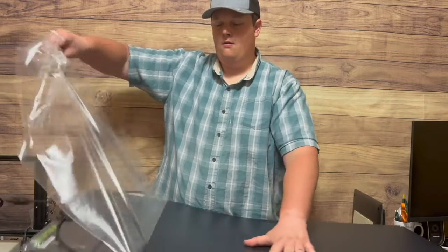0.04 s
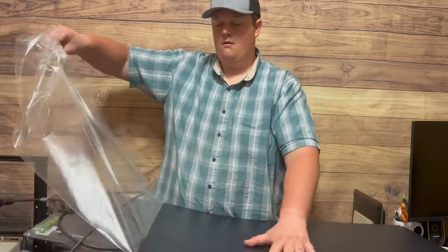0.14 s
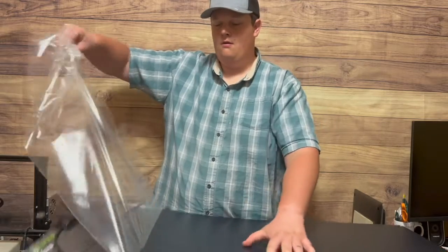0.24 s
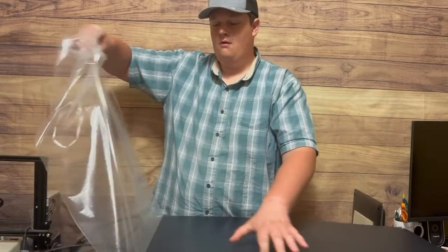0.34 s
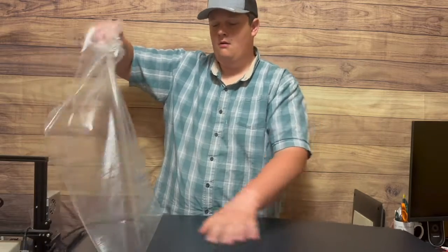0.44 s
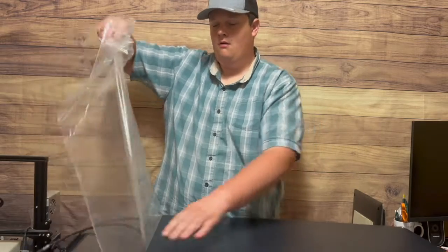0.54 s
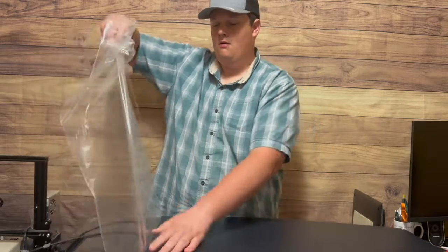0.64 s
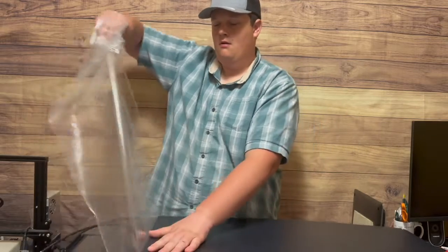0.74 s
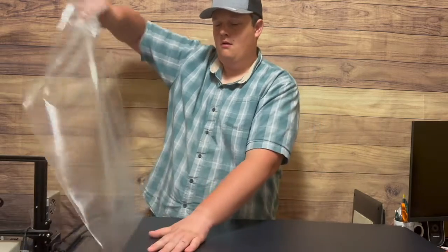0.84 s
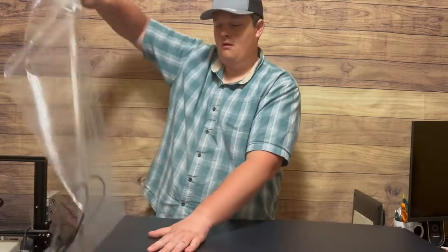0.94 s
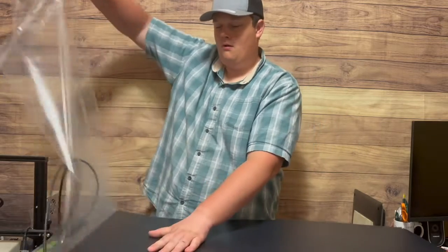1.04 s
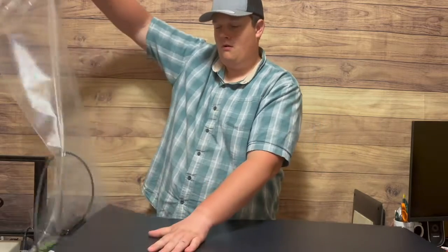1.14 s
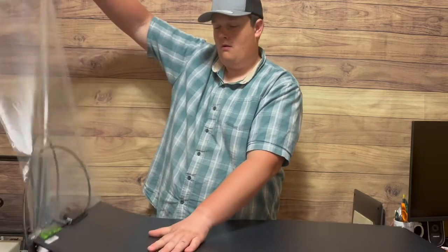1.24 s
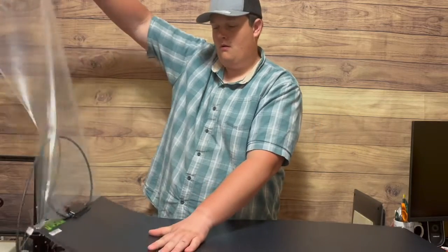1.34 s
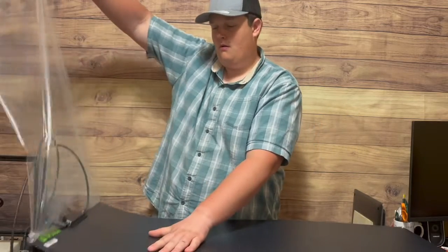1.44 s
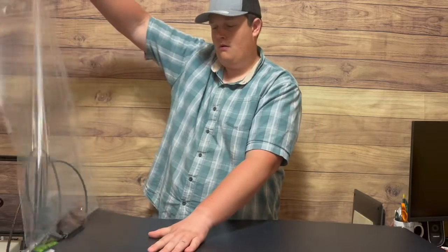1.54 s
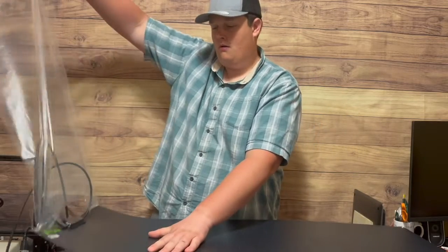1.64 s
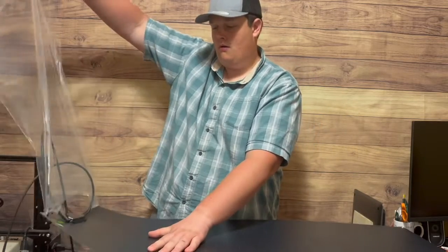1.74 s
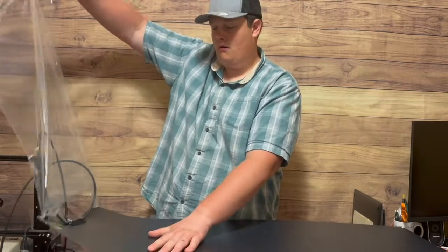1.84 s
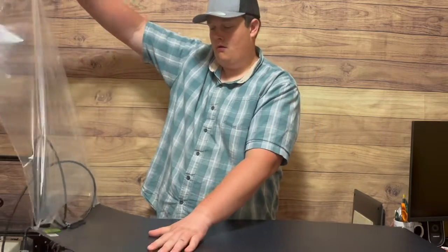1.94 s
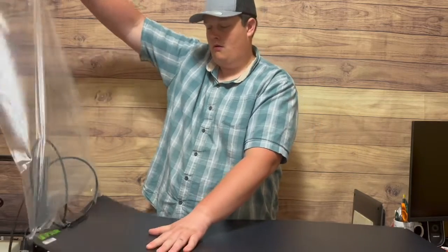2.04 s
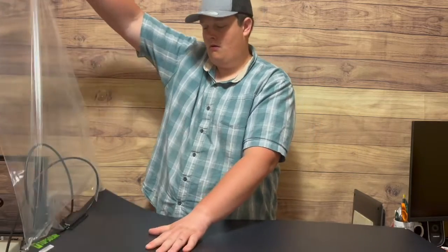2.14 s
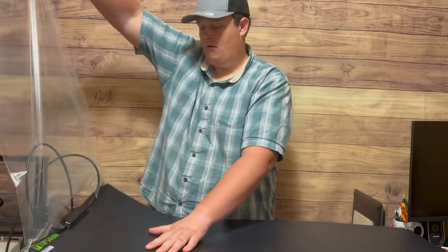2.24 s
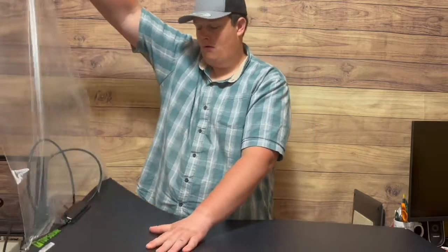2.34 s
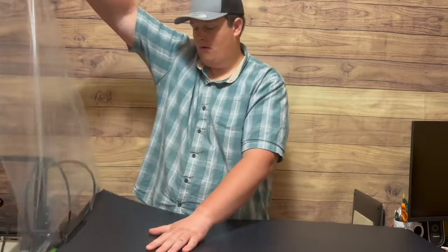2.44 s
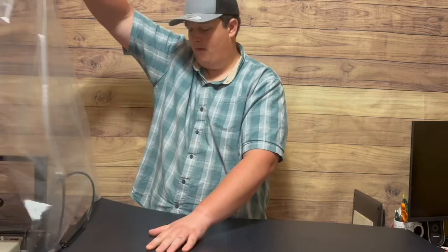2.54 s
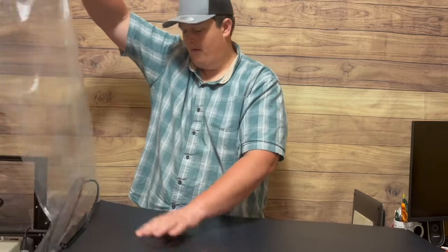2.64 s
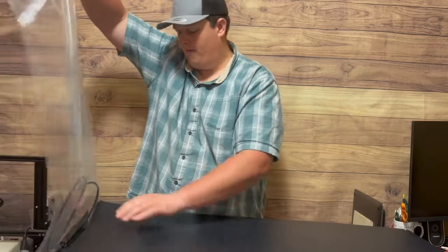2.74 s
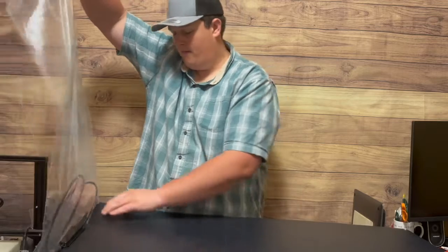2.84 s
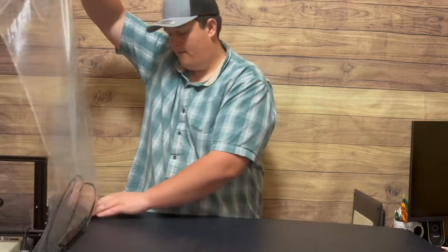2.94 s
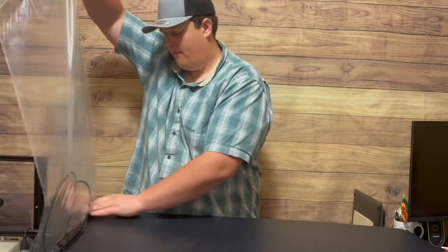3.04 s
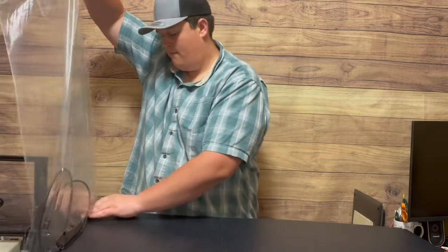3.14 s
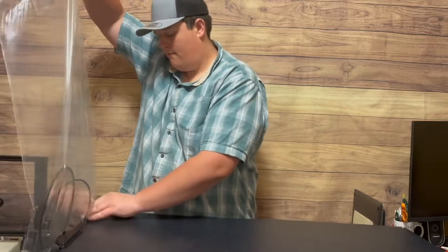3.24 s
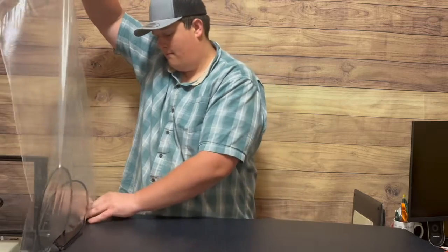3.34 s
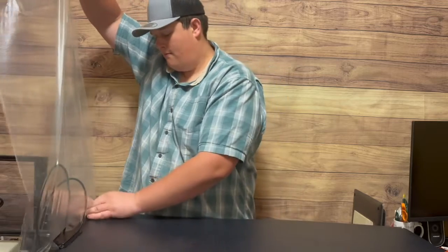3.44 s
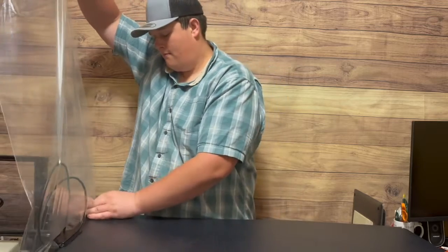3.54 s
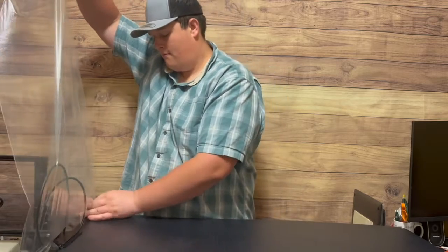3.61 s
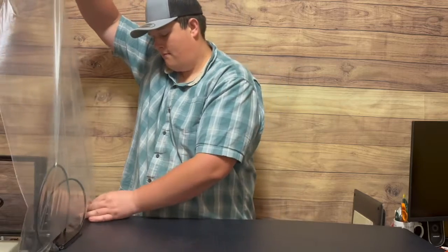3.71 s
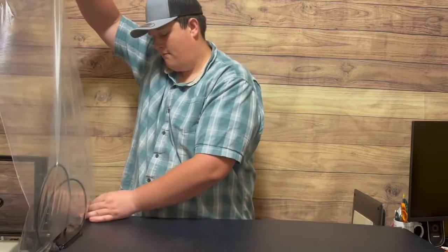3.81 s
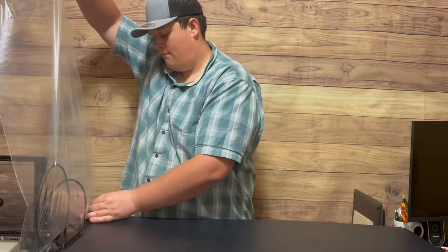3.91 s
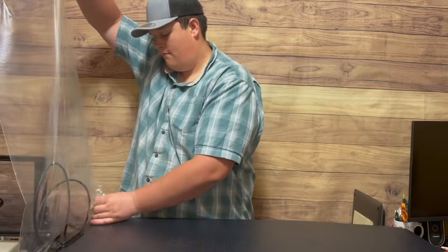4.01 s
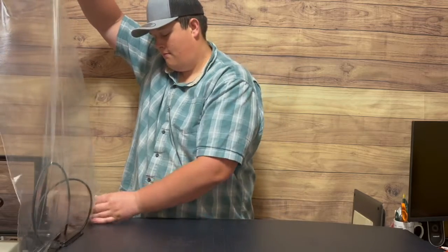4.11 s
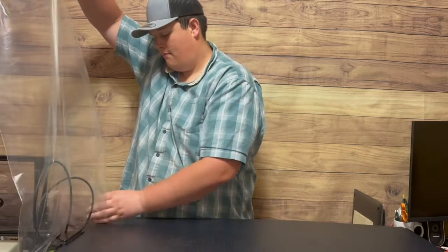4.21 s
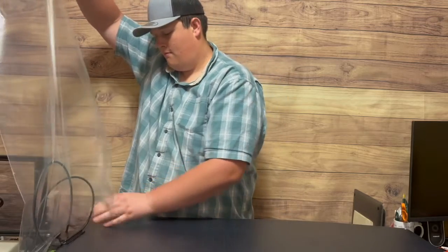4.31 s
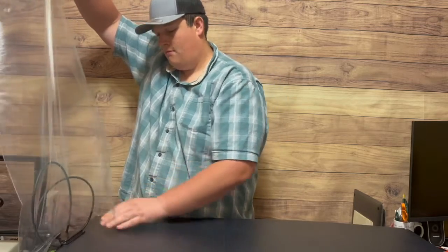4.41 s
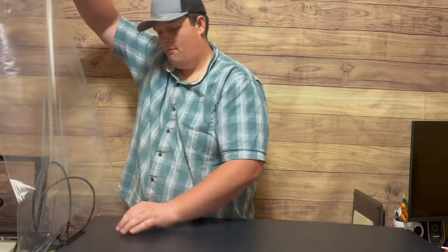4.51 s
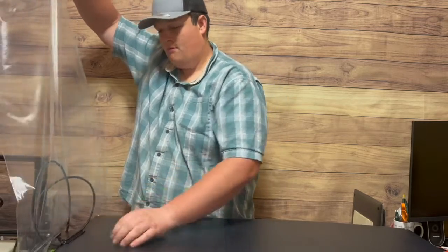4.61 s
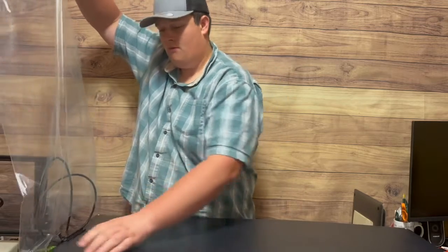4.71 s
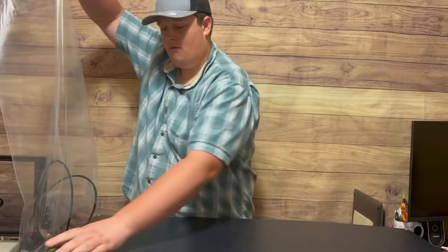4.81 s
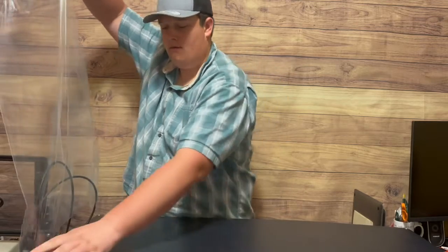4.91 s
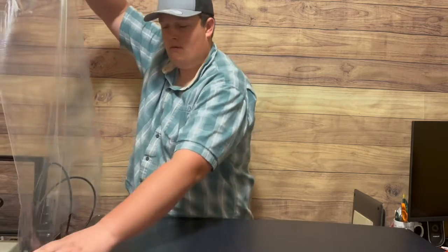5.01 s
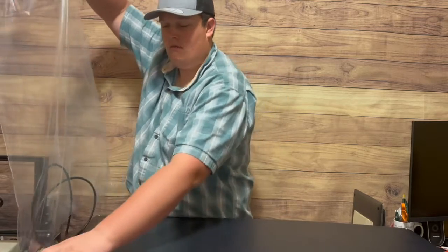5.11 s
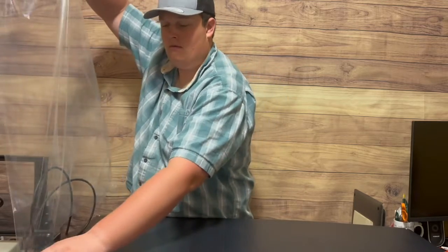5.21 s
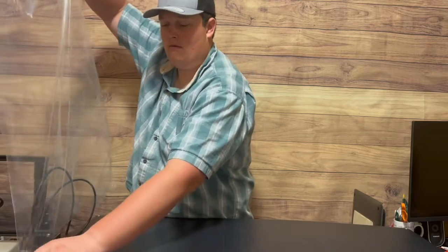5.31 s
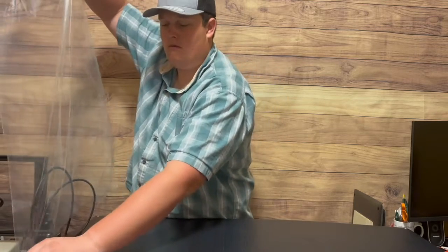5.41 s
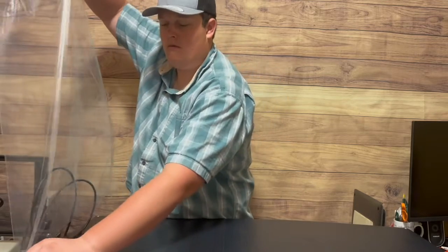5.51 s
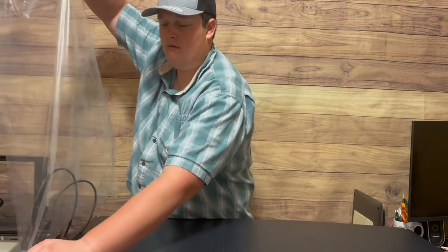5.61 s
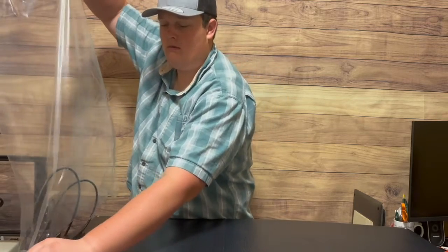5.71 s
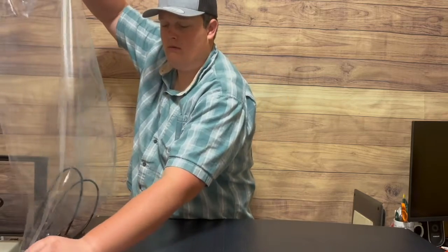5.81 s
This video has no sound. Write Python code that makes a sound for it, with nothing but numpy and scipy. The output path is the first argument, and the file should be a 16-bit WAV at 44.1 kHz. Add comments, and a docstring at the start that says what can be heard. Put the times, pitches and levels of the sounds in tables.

```python
"""Dense plastic crackle comes first, in strong surges over about a second, then mostly weaker tugs, snaps and
pops. A big bag of thin clear film is lifted and tugged off a panel at a desk in a small room, close to a pair
of microphones and a little to their left. Rustle, snaps and ticks are clicks of buckling creases, filtered;
pops are short swings of a facet or, at low pitch, thumps of the whole sheet, rubs are slips that ring the
stretched film, and air is faint filtered noise. Sounds come from seven places on the sheet, each with its own
reflections."""
import sys
import numpy as np
from scipy import signal
from scipy.fft import rfft, irfft, next_fast_len
from scipy.io import wavfile

SR = 44100
rng = np.random.default_rng(int(sys.argv[2]) if len(sys.argv) > 2 else 0)


def materialize(psi):
    """Save the field psi as 16-bit PCM at rate SR to the path in sys.argv[1].

    A 1-D psi becomes a single channel; in a 2-D psi each row is a channel.
    """
    bounded = np.clip(np.atleast_2d(psi).T, -1, 1)
    quanta = np.round(bounded * 32767).astype(np.int16)
    wavfile.write(sys.argv[1], SR, quanta)


N = 258426
TIME = np.arange(N) / SR
CUTOFF_HZ = 15800  # top of the recorded band
PLACES = 7  # sounding places on the sheet


def from_db(db):
    """Decibels to gain."""
    return 10 ** (np.asarray(db) / 20)


def rms_one(x):
    """Scale to unit rms."""
    return x / np.sqrt(np.mean(x ** 2) + 1e-20)


def unit(x):
    """Scale to unit energy."""
    return x / (np.linalg.norm(x) + 1e-12)


def at_hz(rows, hz):
    """Each column of a table, joined on a log-frequency axis."""
    table_hz, *columns = np.transpose(rows)
    log_hz = np.log(np.maximum(hz, 1))
    return [np.interp(log_hz, np.log(table_hz), column) for column in columns]


def drift(rate):
    """Slow random curve of unit rms, through `rate` random points a second."""
    knots = rng.standard_normal(4096)
    return rms_one(np.interp(TIME * rate, np.arange(len(knots)), knots))


def colour(x, spectrum, size=2048):
    """Causal (minimum-phase) filter with the given spectrum, of unit energy below the cut-off, on every row."""
    hz = np.arange(size // 2 + 1) * SR / size
    # folding the cepstrum onto positive time makes the phase minimal
    cepstrum = irfft(np.log(from_db(at_hz(spectrum, hz)[0])))
    cepstrum[1:size // 2] *= 2
    cepstrum[size // 2 + 1:] = 0
    response = np.exp(rfft(cepstrum))
    response /= np.sqrt(np.mean(abs(response) ** 2 * (hz < CUTOFF_HZ)))
    impulse = np.float32(irfft(response))[None]
    return signal.oaconvolve(np.float32(x), impulse, axes=1)[:, :N]


def resonate(x, hz, width_hz):
    """A two-pole resonance that gives a unit click about unit energy."""
    r = np.exp(-np.pi * width_hz / SR)
    zeros = np.sqrt((1 - r * r) / 2) * np.array([1, 0, -1])
    poles = [1, -2 * r * np.cos(2 * np.pi * hz / SR), r * r]
    return signal.lfilter(zeros, poles, x + 1e-18)


def buckles(per_s, spread_db):
    """Random clicks of mean power about 1; a positive spread makes a few large, a negative one a few small."""
    chance = np.clip(per_s / SR, 1e-5, 1)
    sizes = rms_one(from_db(spread_db * np.minimum(rng.exponential(1, N), 4)))
    signs = rng.choice([-1, 1], N)
    return (rng.random(N) < chance) * sizes * signs / np.sqrt(chance)


def over_sheet(clicks, wander_rate=14, scatter=1.3):
    """Deal clicks to places on the sheet, around a fold that wanders across it."""
    fold = PLACES * drift(wander_rate) / 2
    place = np.round(fold + scatter * rng.standard_normal(N)) % PLACES
    return clicks * (place == np.arange(PLACES)[:, None])


def add(out, index, s, sound):
    """Put a sound at its time, each event at the next place on the sheet."""
    span = out[index % PLACES, round(s * SR):][:len(sound)]
    span += sound[:len(span)]


# Steady air noise of the room, falling off above 2 kHz: (frequency [Hz], relative level [dB per Hz])
AIR_SPECTRUM = [(20, -12), (50, 7), (95, 7.5), (170, -5.5), (300, -10), (600, -14), (2000, -10),
                (2400, -25), (6000, -44), (15000, -26)]


def air(level_db=-56.5):
    """Steady filtered noise, independent at every place, so that it fills the room faintly."""
    noise = colour(rng.standard_normal((PLACES, N)), AIR_SPECTRUM)
    return from_db(level_db) * noise / np.sqrt(PLACES)


# Crinkle of the hanging bag, which keeps stirring between tugs: (time [s], crinkle level [dB])
STIRRING = [(0, -50.5), (0.62, -53.5), (1.3, -47), (1.95, -61), (2.3, -63.5), (2.6, -57), (3.6, -62),
            (3.93, -66.5), (4.3, -62.5), (4.9, -68), (5.12, -66), (5.6, -64.5), (5.86, -64.5)]


def stirring():
    """Crinkle level (dB) of the stirring bag at every sample."""
    return np.interp(TIME, *np.transpose(STIRRING))


# A single crease heard close, for ticks and snaps alike: (frequency [Hz], relative level [dB])
CREASE_SPECTRUM = [(150, -15.5), (700, 2.5), (2000, 3.5), (5000, 4), (8500, 4.5), (10400, 1), (12500, 9),
                   (15600, 2.5)]


def ticks(per_s=12, over_stir_db=-6.5):
    """Lone faint creases let go at random about the sheet, louder as the bag stirs more."""
    level = from_db(stirring() + over_stir_db)
    return colour(over_sheet(level * buckles(per_s, spread_db=1.0)), CREASE_SPECTRUM)


# Film rubs on the panel's edge and one stretched facet sings; levels are before the mix:
# (middle [s], time from middle to 1/e [s], level [dB], pitch [Hz], resonance width [Hz])
RUB_EVENTS = [(1.065, 0.013, -25, 850, 79.6), (1.695, 0.021, -34, 1340, 400),
              (2.19, 0.022, -44.5, 1080, 160), (2.268, 0.012, -42.5, 1115, 160),
              (2.405, 0.013, -48.5, 2040, 500), (3.18, 0.034, -43.5, 1290, 350),
              (4.652, 0.009, -58, 625, 150), (4.955, 0.013, -60, 2500, 1500)]


def rubs(slips_per_s=1500, size=8192):
    """Uneven slips swell and fade, feeding one resonance of the stretched film."""
    out = np.zeros((PLACES, N))
    from_middle = (np.arange(size) - size / 2) / SR
    slips = buckles(slips_per_s, spread_db=-8.5)
    for k, (s, length_s, level_db, hz, width_hz) in enumerate(RUB_EVENTS):
        own_slips = slips[k * size:(k + 1) * size]
        tone = resonate(resonate(own_slips, hz, width_hz), hz, 2 * width_hz)
        swell = np.exp(-(from_middle / length_s) ** 2)
        rub = unit(tone * swell) * np.linalg.norm(swell)
        add(out, k, s + from_middle[0], from_db(level_db) * rub)
    return out


# A taut facet of the sheet pops over, or at low pitch the whole sheet thumps; energies are before the mix: #
# (time [s], energy [dB], pitch [Hz], swing time [cycles])
POP_EVENTS = [(0.3735, -1, 4170, 0.35), (0.3762, 12.5, 940, 0.61), (0.386, 7.5, 1234, 1.8),
              (0.457, -7, 1050, 0.37), (1.565, -1, 540, 4.8), (2.254, -19, 1130, 0.2),
              (2.616, -6.5, 1170, 0.52), (2.657, -8.5, 1750, 0.18), (2.70, -12, 61.7, 0.43),
              (2.976, -9.5, 1330, 0.21), (3.968, -3.5, 205, 0.52), (4.0067, 1.5, 1500, 0.15),
              (4.007, 3.5, 376, 0.94), (4.6885, -17.5, 4380, 0.28), (5.468, -5.5, 900, 0.17),
              (5.472, -2, 3300, 0.48), (5.48, -11, 84, 1), (5.681, -20, 3960, 0.85)]


def pops(size=4096):
    """A facet, or at low pitch the whole sheet, gathers speed, flips through and swings out within a few
    cycles."""
    out = np.zeros((PLACES, N))
    age = np.arange(size) / SR
    for k, (s, energy_db, hz, cycles) in enumerate(POP_EVENTS):
        progress = age * hz / cycles
        swing = np.sin(2 * np.pi * hz * age) * progress ** 2 * np.exp(-progress)
        add(out, k, s, from_db(energy_db) * unit(swing))
    return out


# Single creases snapping; energies are before the mix:
# (time [s], energy [dB], run of buckles that it sets off, relative to the crease [dB])
SNAP_EVENTS = [(0.376, -40, 24), (0.602, -17.5, 3), (1.378, -15.5, 4), (1.4683, -12.5, 0), (1.4949, 0, 0),
               (1.6674, -12.5, 7), (1.6941, -3.5, 2.5), (1.709, 1, -4), (1.8022, -11.5, -17),
               (2.0006, -31, 9), (2.055, -26, 2), (2.2555, -38, 11), (2.3361, -16, -22), (2.371, -30, 12),
               (2.452, -13, 3.5), (2.852, -25, -10), (2.8861, -21.5, -10), (3.1738, -24.5, 7.5),
               (3.468, -15.5, -10), (3.492, -22, 4), (3.6267, -23, -13), (3.6636, -12.5, -32),
               (3.7423, -23, -7), (3.763, -16, -6), (3.8277, -16, -1), (3.965, -13, 11.5), (4.0172, -7, -9),
               (4.1824, -26, 9), (4.1898, -22, -1), (4.2472, -23, 6), (4.313, -13.5, -1),
               (4.3598, -16.5, 2), (4.3958, -9, -16), (4.5859, -17.5, 3), (4.6885, -14.5, -8),
               (4.8012, -23, -1), (5.1524, -28.5, 7), (5.4666, -4, 6.5), (5.6802, -30, 10.5),
               (5.7835, -19.5, -7.5), (5.8427, -11.5, -8)]


def snaps(travel_s=0.0004127, run_s=0.0062, run_per_s=2000, size=2048):
    """A crease gives way at once and trips a dying run of its neighbours."""
    out = np.zeros((PLACES, N))
    age, hz = np.arange(size) / SR, np.arange(size // 2 + 1) * SR / size
    # bending waves cross the film faster the higher they are; travel_s is their time at the cut-off
    crease = unit(irfft(np.exp(-4j * np.pi * travel_s * np.sqrt(hz * CUTOFF_HZ))))
    followers = buckles(run_per_s, spread_db=3.0)
    for k, (s, energy_db, run_db) in enumerate(SNAP_EVENTS):
        run = unit(followers[k * size:(k + 1) * size] * np.exp(-age / run_s))
        add(out, k, s - travel_s, from_db(energy_db) * (crease + from_db(run_db) * run))
    return colour(out, CREASE_SPECTRUM)


# Tugs and shakes of the bag; rise and fall times each cover 20 dB, the last three levels are over the crinkle:
# (full pull [s], rise [s], hold [s], fall [s], crinkle [dB], billow [dB], flexing [dB], sharpest creases [dB])
TUG_EVENTS = [(0.0, .05, 0.092, 0.12, -24, -5, -0.5, 1.5),
              (0.374, 0.0037, 0.0046, 0.077, -31.5, 6.5, 13, -3.5),
              (0.484, 0.087, 0.0092, 0.093, -46, 8.5, 7.5, 3.5), (0.523, 0.036, 0.013, .05, -47, 8, 11, 5),
              (0.78, 0.078, .08, 0.094, -25.5, -1, 3.5, 2.5), (0.866, 0.085, 0.048, 0.23, -22, -30, 1, 2),
              (1.052, 0.14, 0.16, 0.08, -26.5, -5.5, 0.5, 3.5),
              (1.38, 0.19, 0.013, 0.11, -46, -3, -2.5, -1.5),
              (1.495, 0.0049, 0.017, 0.11, -32.5, -7.5, 0, 1.5),
              (1.563, 0.076, 0.013, 0.11, -30.5, -8.5, 0.5, -1),
              (1.70, 0.039, 0.0045, 0.083, -38.5, -0.5, -1.5, 8.5),
              (1.843, 0.071, 0.028, 0.05, -40.5, -3, 1, -3),
              (2.077, 0.2, 0.054, .11, -47.5, -26, -2.5, -6.5),
              (2.41, 0.076, 0.059, 0.17, -49.5, -23, -15.5, -5), (2.564, 0.044, .03, 0.16, -41, -8, -3, -2),
              (2.655, 0.058, 0.053, 0.14, -40.5, -3, 5, -13),
              (2.992, 0.055, 0.032, 0.087, -44, -4, 3.5, -2.5),
              (3.158, 0.12, 0.045, .15, -45.5, -6, -0.5, -4.5), (3.32, 0.2, .04, 0.11, -55.5, -11, -11, -1),
              (3.494, 0.062, 0.023, 0.1, -48.5, -12, -8, -3), (3.55, .05, 0.012, 0.076, -54.5, -10, 0.5, 4),
              (3.812, 0.049, .015, 0.064, -47, -11, -2.5, -4),
              (3.962, 0.0053, 0.012, 0.11, -33, -2.5, 1.5, -1.5),
              (4.002, 0.0065, 0.0051, 0.073, -41.5, 9.5, 11, -14),
              (4.259, 0.3, .13, 0.1, -49, -8.5, -3, -4), (4.576, 0.075, 0.005, 0.065, -50, -5, 0.5, 0),
              (4.701, 0.038, 0.027, 0.097, -54, -14, -27, -8), (5.185, 0.036, 0.057, 0.12, -61, -8, 7, 15),
              (5.259, .1, 0.022, 0.15, -43, -28, -2.5, -9.5), (5.469, 0.011, 0.017, 0.079, -38, -6, 3, 1.5),
              (5.851, 0.04, .02, .1, -39, -18, -6.5, -7)]


def handling(sway_db=-58, stir_flex_db=-1.5, stir_sharp_db=-5.5):
    """Levels (dB) of billow, flexing, crinkle and sharpest creases: tugs rise, hold and die over sway and stirring."""
    stir_db = stirring()
    sway = np.full(N, sway_db)  # the whole sheet sways a little all the time
    power = from_db([sway, stir_db + stir_flex_db, stir_db, stir_db + stir_sharp_db]) ** 2
    for s, rise_s, hold_s, fall_s, level_db, billow_db, flex_db, sharp_db in TUG_EVENTS:
        corners = [s - 4 * rise_s, s, s + hold_s, s + hold_s + 4 * fall_s]
        pull_db = np.interp(TIME, corners, [-80, 0, 0, -80])
        on = pull_db > -80
        kinds = from_db([billow_db, flex_db, 0, sharp_db])
        power[:, on] += np.outer(kinds, from_db(level_db + pull_db[on])) ** 2
    return 10 * np.log10(power)


# What one buckle radiates, from the whole sheet down to the sharpest crease;
# each is (frequency [Hz], relative level [dB])
BILLOW_SPECTRUM = [(25, -32), (50, -5), (90, 4), (140, 9), (280, -1), (400, 1.5), (900, -60.5)]
FLEX_SPECTRUM = [(130, -31), (240, 0.5), (340, 2.5), (800, 0.5), (1300, -0.5), (1800, -4.5), (2600, -9.5),
                 (6000, -47)]
CRINKLE_SPECTRUM = [(600, -48), (1300, 0.5), (2000, 2), (3200, 3.5), (5500, 0.5), (7500, -6.5), (9500, -27),
                    (15000, -16)]
SHARP_SPECTRUM = [(3000, -77), (6500, -0.5), (8500, 4.5), (10400, -13.5), (12400, 6.5), (14300, 2.5),
                  (15600, 3.5)]


def rustle(loud_per_s=10000, loud_db=-22, crowding=.75, clump_db=0.84, clump_rate=110):
    """The harder the pull, the more creases give way each second; they go in clumps."""
    billow_db, flex_db, crinkle_db, sharp_db = handling()
    per_s = loud_per_s * from_db(crowding * (crinkle_db - loud_db))
    clumps_db = clump_db * drift(clump_rate)
    billow = from_db(billow_db) * buckles(per_s, spread_db=2.5)
    flex = from_db(flex_db + clumps_db) * buckles(per_s, spread_db=2.0)
    crinkle = from_db(crinkle_db + clumps_db) * buckles(per_s, spread_db=4.0)
    sharp = from_db(sharp_db + clumps_db) * buckles(per_s, spread_db=-3.5)
    kinds = [(billow, BILLOW_SPECTRUM), (flex, FLEX_SPECTRUM),
             (crinkle, CRINKLE_SPECTRUM), (sharp, SHARP_SPECTRUM)]
    return sum(colour(over_sheet(clicks), spectrum) for clicks, spectrum in kinds)


# The pitch that each place on the sheet favours, from slack and wide to tight and small: (frequency [Hz])
FACET_PITCHES = [720, 1050, 1500, 2270, 2680, 3580, 5300]


def facets(x, lift_db=5, sharpness=4, trim_db=-1.29):
    """Each place lifts its own pitch, so the colour shifts as the fold wanders."""
    rings = []
    for hz, row in zip(FACET_PITCHES, x):
        zeros, poles = signal.iirpeak(hz, sharpness, fs=SR)
        rings.append(signal.lfilter(zeros, poles, row + 1e-18))
    return from_db(trim_db) * (x + (from_db(lift_db) - 1) * np.array(rings))


# The small room at the microphones; likeness is of the left and right reflections, clipped to -1..1:
# (frequency [Hz], decay t60 [s], reflected over direct [dB], likeness [-1 to 1], left over right [dB])
ROOM_BANDS = [(60, 0.41, -13, 0.74, -0.5), (204, 0.32, 11.5, 0.9, 0.4), (426, 0.22, 2, 0.38, 0.6),
              (1000, 0.18, 6.5, -0.75, 2), (2350, 0.053, -2, -1.62, 1.5), (3400, 0.14, 2, -0.21, 1.5),
              (5170, 0.26, 5.5, -0.2, 7), (7340, 0.2, 2.5, 0.11, 1.5), (9900, 0.13, -15, 1, -4),
              (11800, 0.29, 8, 1, 2), (15700, 0.18, -31.5, 1, -1.5)]


def room(x, build_s=0.00042, right_lag_s=.000148, size=16384):
    """Each place has its own diffuse tail, dying band by band; all reaches the right microphone a little later."""
    age, hz = np.arange(size) / SR, np.arange(size // 2 + 1) * SR / size
    centres = np.geomspace(60, 16000, 9)
    white = rng.standard_normal((2, PLACES, size)).astype(np.float32)
    tail = 0
    for centre, own in zip(centres, np.eye(len(centres))):
        band = at_hz(np.column_stack([centres, own]), hz)[0]
        t60_s = at_hz(ROOM_BANDS, centre)[0]
        decay = from_db(-60 * age / t60_s) * (1 - np.exp(-age / build_s))
        tail = tail + band * rfft(white * np.float32(unit(decay)))
    _, wet_db, alike, left_db = at_hz(ROOM_BANDS, hz)
    alike, wet = np.clip(alike, -1, 1), from_db(wet_db)
    sides = np.array([1, -1])[:, None, None]  # left, right
    # one tail is common to both microphones, the other is opposite in them
    reflected = np.sqrt((1 + alike) / 2) * tail[0] + sides * np.sqrt((1 - alike) / 2) * tail[1]
    response = (1 + wet * reflected) / np.hypot(1, wet) * from_db(sides * left_db / 2)
    response[1] *= np.exp(-2j * np.pi * hz * right_lag_s)
    echoes = np.float32(irfft(response)[..., :-size // 8])  # leave off the last eighth
    padded = next_fast_len(N + size, True)
    at_microphones = (rfft(np.float32(x), padded) * rfft(echoes, padded)).sum(axis=1)
    return irfft(at_microphones, padded)[:, :N]


def scene():
    """All sounds of the film, and the faint air noise, in the room."""
    film = ticks() + from_db(1.0) * rubs() + from_db(-1.0) * pops()
    film = film + from_db(-1.5) * snaps() + facets(rustle())
    return room(air() + film)


def record(dry):
    """A steep elliptic low-pass cuts the top."""
    low_pass = signal.ellip(12, .1, 80, CUTOFF_HZ, fs=SR, output="sos")
    return signal.sosfilt(low_pass, dry)


dry = scene()
out = record(dry)
materialize(out)
```